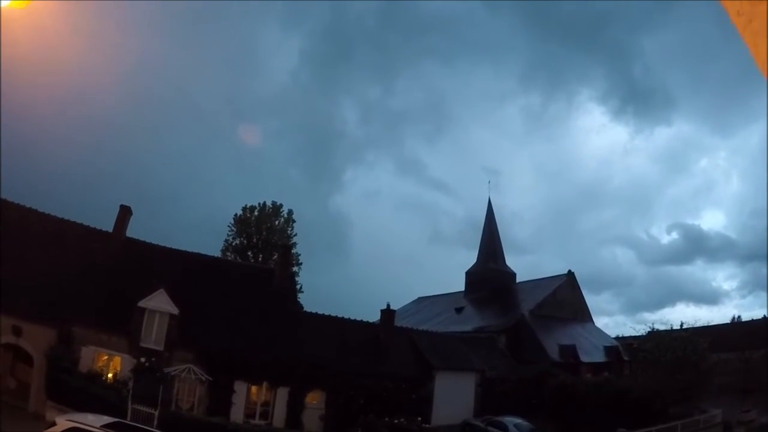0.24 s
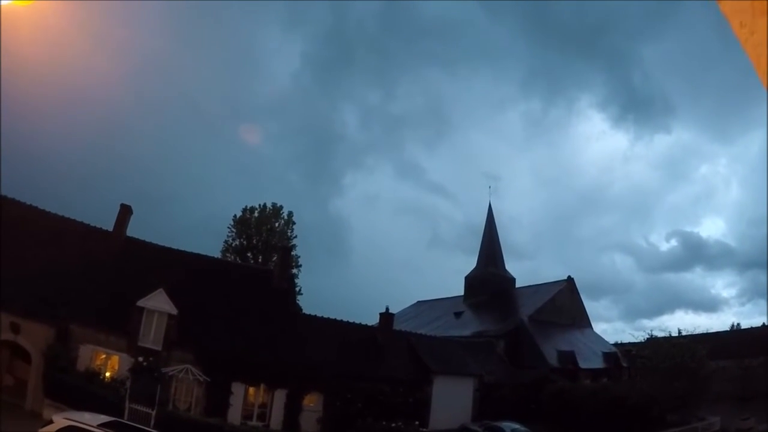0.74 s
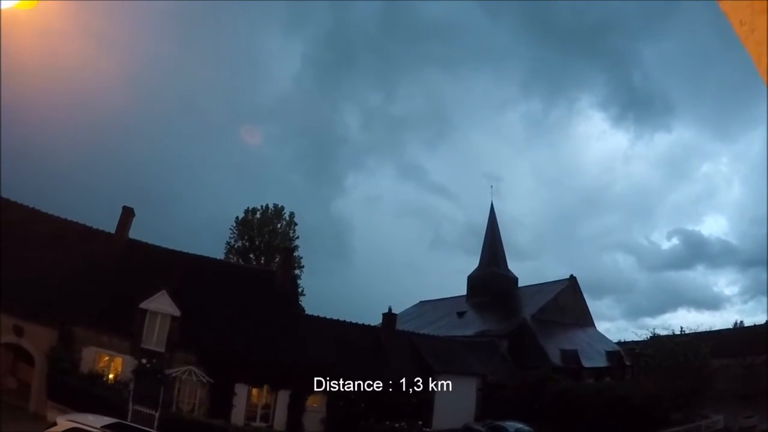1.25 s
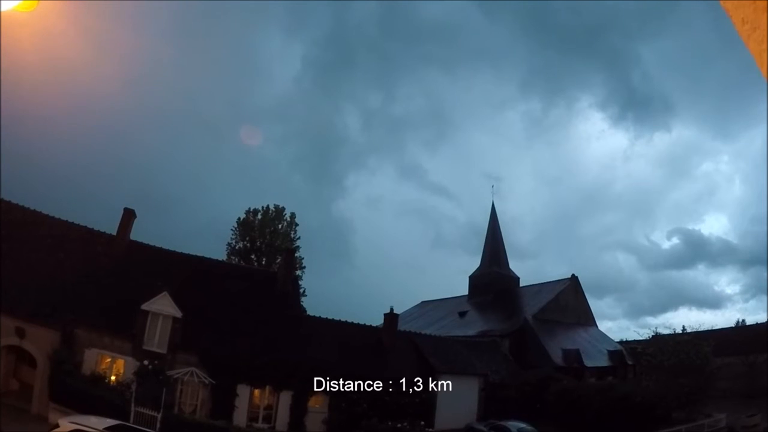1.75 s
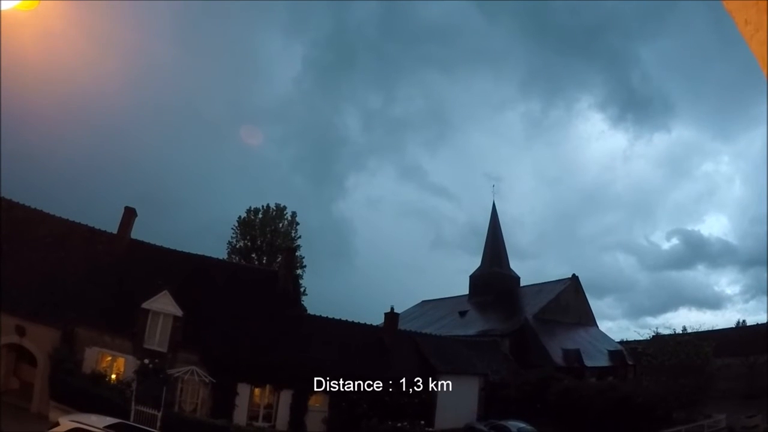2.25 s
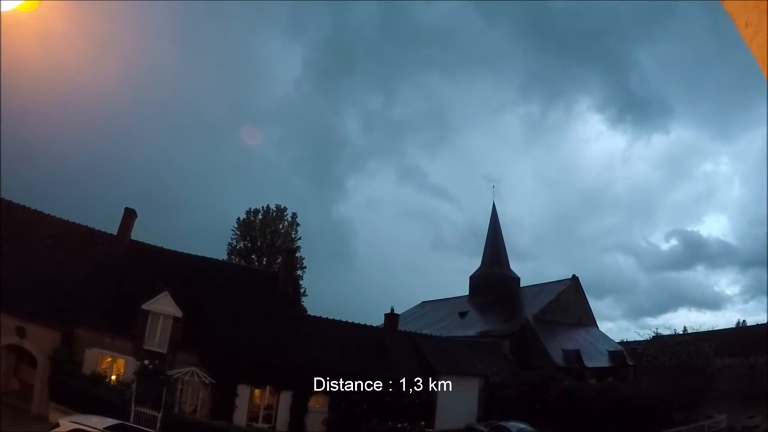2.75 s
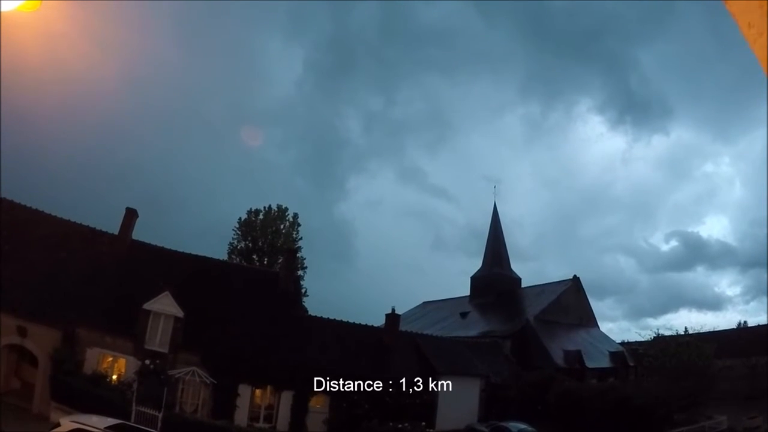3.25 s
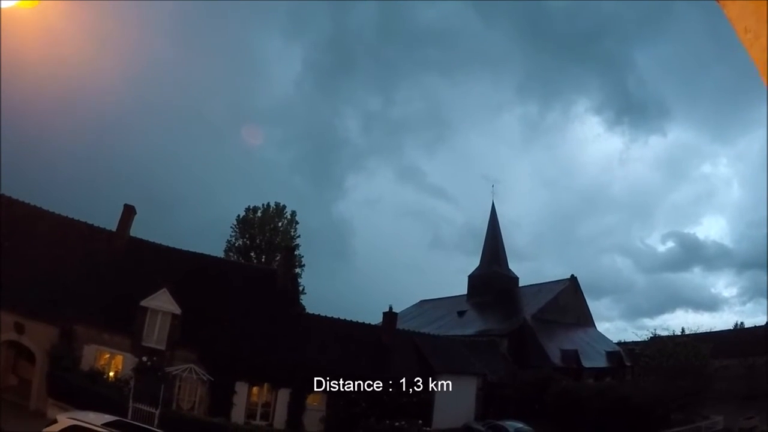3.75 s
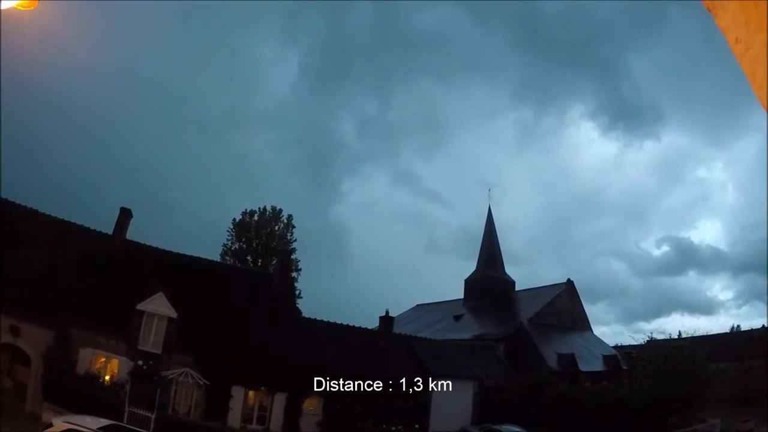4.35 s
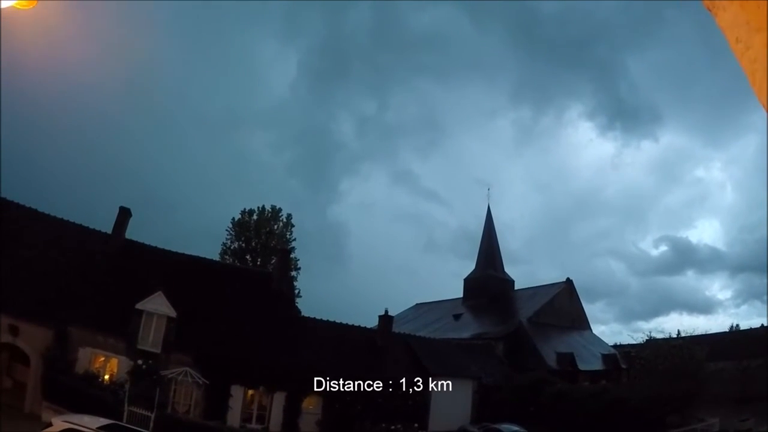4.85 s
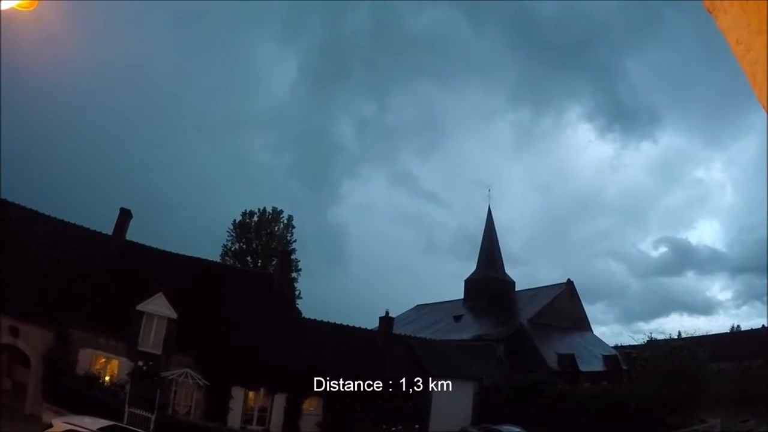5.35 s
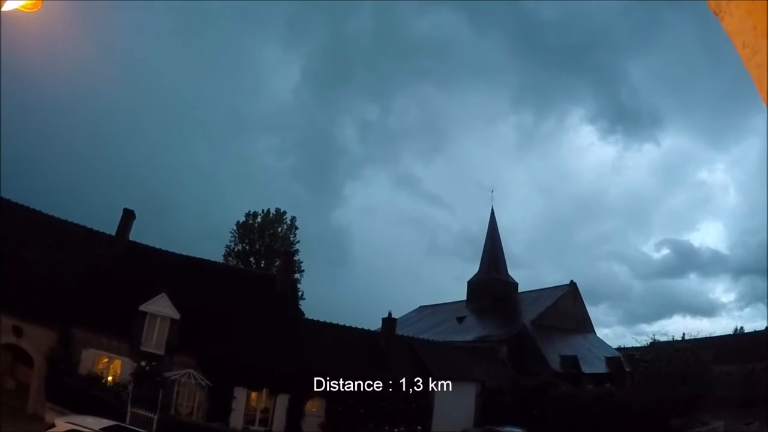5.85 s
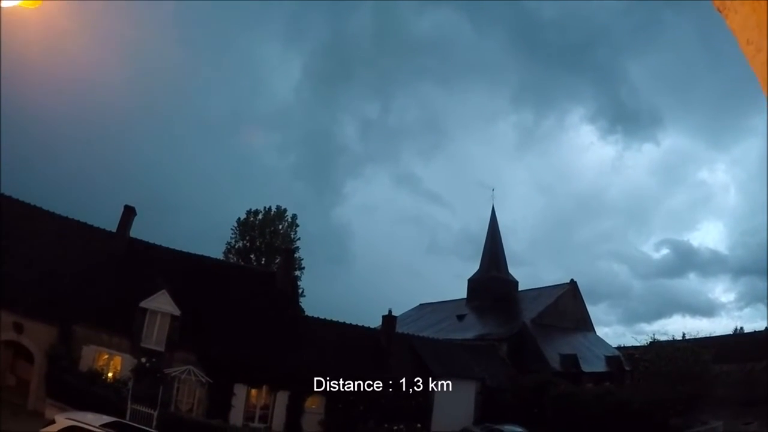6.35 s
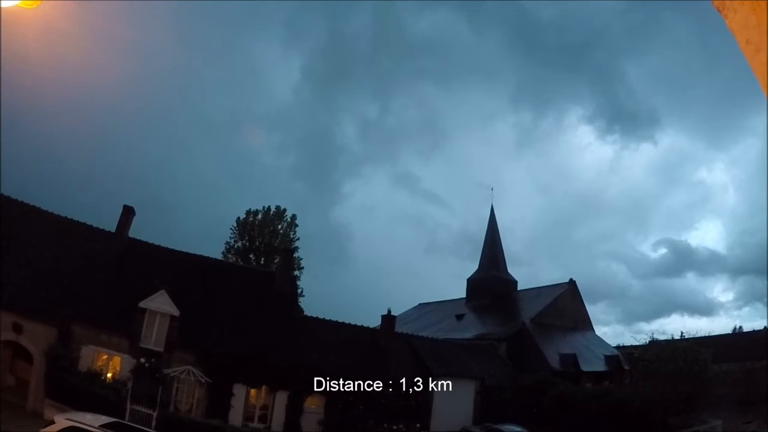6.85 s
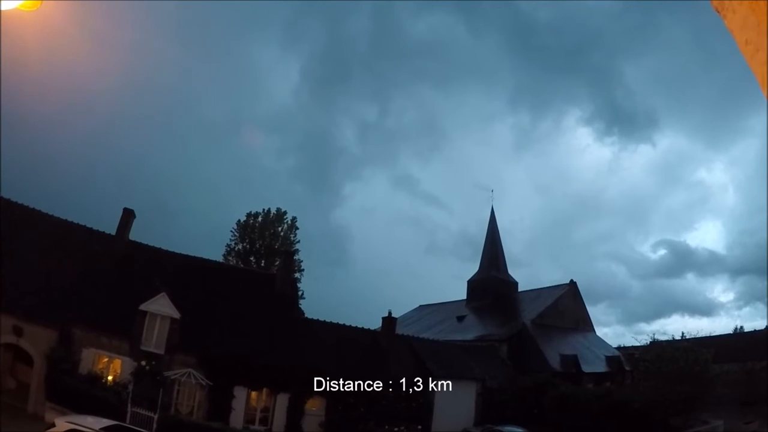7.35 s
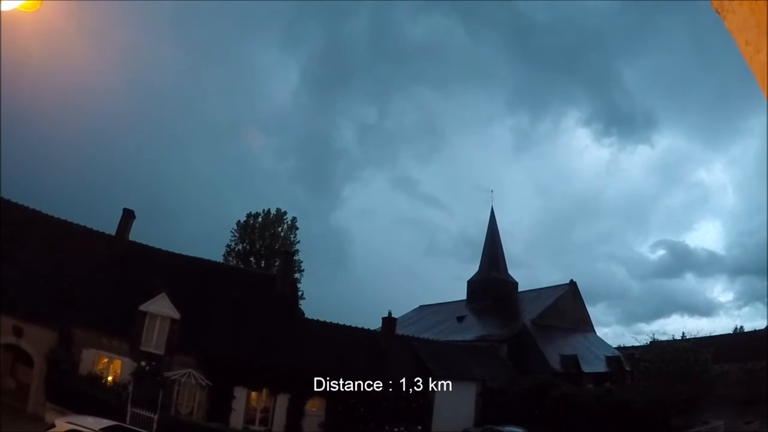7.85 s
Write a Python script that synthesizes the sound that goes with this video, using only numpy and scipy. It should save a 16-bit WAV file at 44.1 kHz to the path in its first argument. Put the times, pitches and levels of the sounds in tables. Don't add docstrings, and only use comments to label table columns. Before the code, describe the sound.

Deep thunder rolls between village houses, starting faintly, surging in heavy low thumps with soft tearing crackle, while a few raindrops tick close by

```python
import sys
import numpy as np
from scipy import signal
from scipy.fft import rfft, irfft, next_fast_len
from scipy.io import wavfile
from scipy.ndimage import uniform_filter1d

SR = 44100
rng = np.random.default_rng(int(sys.argv[2]) if len(sys.argv) > 2 else 0)


def makeup_ratio(level_db):
    decades = np.asarray(level_db, float) / 20
    return 10 ** decades


def unload_audio(sound):
    columns = np.transpose(np.atleast_2d(sound))
    steps = np.round(np.clip(columns, -1, 1) * 32767)
    wavfile.write(sys.argv[1], SR, steps.astype(np.int16))


N = 357210


def evened(x):
    return x / np.sqrt(np.mean(x ** 2) + 1e-20)


def read(points, hz):
    f, value = np.transpose(points)
    return np.interp(np.log(hz + 1), np.log(f + 1), value)


def add(mix, s, sound):
    part = mix[round(s * SR):][:len(sound)]
    part += sound[:len(part)]


def coloured(x, points):
    gain_db = read(points, abs(np.fft.fftfreq(16384, 1 / SR)))
    log_gain = np.log(makeup_ratio(np.maximum(gain_db, -100)))
    phase = -signal.hilbert(log_gain).imag
    taps = np.fft.ifft(np.exp(log_gain + 1j * phase)).real[:8192]
    return signal.oaconvolve(x, taps)[:len(x)]


def clicks(per_s, spread_db):
    size = makeup_ratio(spread_db * np.minimum(rng.exponential(1, N), 4))
    sign = rng.choice([-1., 1.], N)
    return evened(size * sign * (rng.random(N) < per_s / SR))


# f/Hz, time to fall 60 dB/s
SQUARE_ECHO = [
    (40, 0.77),
    (200, 0.51),
    (800, 0.78),
    (3000, 0.49),
]


def square(x, directions=11):
    hz, t, z = signal.stft(rng.standard_normal((directions, SR)), SR, nperseg=1024)
    fade_db = -60 * t / read(SQUARE_ECHO, hz)[:, None]
    tails = signal.istft(z * makeup_ratio(fade_db), SR, nperseg=1024)[1]
    direction = rng.integers(0, directions, N)
    size = next_fast_len(N + SR + 2048)
    echo = 0
    for k, tail in enumerate(tails):
        echo = echo + rfft(x * (direction == k), size) * rfft(tail / np.linalg.norm(tail), size)
    echo_db = 12.5
    return x + makeup_ratio(echo_db) * irfft(echo, size)[:N]


# t/s, level/dB
ROLL_LEVEL = [(0, -49), (.08, -59), (.708, -60.5), (.718, -48), (1.3, -45), (1.36, -36.5), (2.1, -32),
              (2.8, -30), (3.45, -33.5), (4.1, -35), (5.05, -32.5), (5.4, -28), (5.75, -32), (6.35, -30),
              (6.75, -27.5), (7.25, -33.5), (7.6, -27.5), (8.1, -32.5)]
# t/s, share (0-1)
FARNESS = [
    (0, 0.7),
    (1.5, 0.41),
    (3.3, 0.03),
    (4.2, 0.46),
    (5.2, 0.76),
    (6, 0.77),
    (8.1, 0.94),
]
# f/Hz, level/dB per Hz
NEAR_COLOUR = [(12, -19.5), (34, -8), (50, 5), (105, -6.5), (160, -14), (240, -7), (319, -4.5),
               (429, -13.5), (470, -10.5), (540, -21), (790, -32), (1770, -40.5), (2400, -54), (5000, -89)]
# f/Hz, level/dB per Hz
FAR_COLOUR = [(12, -30), (34, -9.5), (50, -6), (155, -5.5), (193, -14), (227, -8), (278, -16), (326, -10.5),
              (470, -18), (590, -21.5), (760, -30.5), (880, -38.5), (1370, -42.5), (2220, -66.5),
              (5000, -97.5)]
RANGE_EDGES_HZ = (80, 200, 500, 850)
# centre f/Hz, level/dB at the middle level, share of the level followed, gain from afar/dB
RANGES = [
    (50, -31, 0.99, 4.5),
    (130, -29.5, 0.99, 2.5),
    (330, -32.5, 1.08, -1.5),
    (650, -44, 1.33, -3),
    (1300, -54, 1.15, -10),
]
# t/s,
# swell level/dB, f/Hz, length/s
SURGES_AND_LULLS = [(0.719, 9.5, 300, 0.026), (0.92, 5, 200, 0.052), (1.012, -12, 50, 0.066),
                    (1.212, 7.5, 242, 0.042), (2.482, 6, 370, 0.044), (2.55, 7, 50, 0.042), (2.702, 7.5, 50, 0.024),
                    (2.744, 6.5, 160, 0.027), (2.84, 4.5, 151, 0.02), (0.945, 10, 42, 0.04), (3.225, 5, 110, 0.071),
                    (3.334, 6.5, 55, 0.089), (3.53, 2.5, 130, 0.022), (3.604, 15, 55.4, 0.021),
                    (3.707, 5.5, 60, 0.078), (4.23, 5, 110, 0.015), (4.42, 4.5, 50, 0.04), (4.66, 2.5, 110, 0.074),
                    (4.838, 3, 79.6, 0.031), (5.536, 4, 109, 0.031), (5.75, -5.5, 45, 0.05),
                    (6.037, 10.5, 74.6, 0.034), (5.9, -3.5, 200, 0.086), (6.58, 6, 145, 0.035),
                    (6.766, 5, 350, 0.048), (1.35, -4, 45, 0.056), (7.388, 8, 120, 0.024), (7.547, 4, 330, 0.065),
                    (7.742, 5, 298, 0.022), (7.75, -5, 42, .05),
                    (0.795, -5, 130, 0.049), (1.09, -4, 45, .06), (1.8, -4, 150, 0.029), (1.48, -7, 80, 0.066),
         (1.83, -4, 83, 0.24), (2.195, -6, 130, 0.037), (2.503, -6.5, 151, 0.067), (2.618, -7.5, 50, 0.045),
         (3.8, -7, 40, .05), (4.4, 4, 53, .05), (4.32, -3, 88, 0.12), (3.758, -11.5, 120, 0.028),
         (4.105, -11, 55, 0.031), (4.5, -5, 51, 0.045), (4.95, -4, 42, 0.055), (5.965, -6.5, 60, 0.056),
         (6.31, -6, 180, 0.042), (5.25, -2, 45, 0.05), (7.301, -2.5, 90, 0.1), (7.79, -7, 50, 0.047),
         (8.01, -4, 70, 0.025), (6.139, -5, 200, 0.14), (2.708, -4.5, 200, 0.065), (4.78, -2.5, 110, .05),
         (0.23, 12.5, 42, 0.076), (1.2, -5, 65, 0.029), (5.078, -4, 116, 0.12), (5.3, -2.5, 80, .03),
         (6.99, -4.5, 100, 0.02), (6.464, -1.5, 100, 0.024), (2.318, -11, 200, 0.018),
         (2.422, -4.5, 270, 0.04)]
# t/s, swell level/dB, length/s
RIPS = [(0.784, 10, 0.098), (0.915, 11.5, 0.073), (1.05, 4, 0.056), (1.204, 8, 0.093), (2.005, 2, 0.035),
        (2.24, 3.5, 0.062), (2.487, 1, 0.075), (2.776, 4.5, 0.074), (2.86, 4.5, 0.036), (3.153, 5.5, 0.031),
        (1.867, 2.5, 0.062), (3.863, 0, 0.031), (4.25, 4, 0.033), (5.426, -1, 0.061), (5.94, 1, .06),
        (6.604, 1, 0.048), (5.572, 1.5, 0.13), (6.771, 1, 0.056), (7.16, 2.5, 0.08), (7.712, 0.5, 0.041),
        (3.407, 1, 0.034), (1.44, -4, 0.056)]
# t/s, swell level/dB, length/s
CRESTS = [(0.88, -2, 0.037), (1.06, -4, 0.05), (1.31, 1, 0.05), (1.492, 1, 0.05), (1.745, -1.5, 0.05),
          (2.1, -3, 0.05), (2.262, 1.5, 0.043), (3.015, 2, 0.055), (3.196, 4, 0.035), (3.286, 1.5, 0.05),
          (3.47, -2, 0.05), (3.577, 1.5, 0.041), (1.496, 0.5, 0.1), (5.42, 2, 0.08), (4.24, -3, 0.041),
          (4.342, 1.5, 0.05), (6.76, 2, 0.04), (5.028, -5, 0.055), (5.167, -4.5, 0.05), (7.35, 1, 0.37),
          (5.818, 4, 0.042), (5.912, -3.5, 0.045), (5.986, 3, 0.034), (6.155, 2.5, 0.039),
          (6.61, 5.5, 0.05), (6.818, 1.5, 0.05), (6.96, 2, 0.046), (7.133, 0.5, 0.05), (7.27, 3, 0.056),
          (7.56, 1, 0.06)]


def roll():
    t = np.arange(N) / SR
    shocks = square(clicks(per_s=300, spread_db=4.0))
    far = np.clip(np.interp(t, *np.transpose(FARNESS)), 0, 1)
    near_sound, far_sound = coloured(shocks, NEAR_COLOUR), coloured(shocks, FAR_COLOUR)
    spectrum = rfft((1 - far) * near_sound + far * far_sound)
    hz = np.fft.rfftfreq(N, 1 / SR)
    below = [0] + [1 / (1 + (hz / edge) ** 12) for edge in RANGE_EDGES_HZ] + [1]

    coarse = t[::128]
    rip_hz, reach_octaves = 1070, 1.35
    rips = [(s, db, rip_hz, length) for s, db, length in RIPS]
    s, swell_db, pitch_hz, length = np.transpose(SURGES_AND_LULLS + rips)
    swells_db = swell_db * np.exp(-((coarse[:, None] - s) / length) ** 2)
    s, swell_db, length = np.transpose(CRESTS)
    crest_db = np.exp(-((coarse[:, None] - s) / length) ** 2) @ swell_db

    middle_db = -32
    level_db = np.interp(t, *np.transpose(ROLL_LEVEL)) - middle_db
    out = np.zeros(N)
    for k, (centre_hz, db, share, far_db) in enumerate(RANGES):
        band = irfft(spectrum * (below[k + 1] - below[k]), N)
        power = uniform_filter1d(uniform_filter1d(band ** 2, size=3200), size=3200)
        steady = band / np.sqrt(power + 1e-20)
        surge_db = swells_db @ np.exp(-(np.log2(pitch_hz / centre_hz) / reach_octaves) ** 2)
        if k == 3:
            surge_db = surge_db + crest_db
        out += steady * makeup_ratio(db + share * level_db + far_db * far + np.interp(t, coarse, surge_db))
    return out


# f/Hz, level/dB per Hz
CALM_COLOUR = [(12, -34), (20, 0.5), (49, 3.5), (109, -8.5), (231, -15.5), (403, -20.5), (490, -21),
               (764, -33), (1410, -36.5), (1710, -34), (2200, -36), (4920, -39), (6690, -42.5),
               (14200, -49.5), (15400, -55.5)]
DRIZZLE_HZ = (2300, 2900, 3700, 4600, 5700)


def calm():
    ticks = clicks(per_s=150, spread_db=3.8)
    kind = rng.integers(0, len(DRIZZLE_HZ) - 1, N)
    fizz, drizzle = rng.standard_normal(N), 0
    for k, band in enumerate(zip(DRIZZLE_HZ, DRIZZLE_HZ[1:])):
        size = signal.lfilter([1], [1, -np.exp(-1 / 200)], ticks * (kind == k))
        drizzle = drizzle + signal.lfilter(*signal.butter(2, band, "band", fs=SR), size * fizz)
    hiss = evened(coloured(rng.standard_normal(N), CALM_COLOUR))
    hiss_db, drizzle_db = -48.5, -81.5
    return makeup_ratio(hiss_db) * hiss + makeup_ratio(drizzle_db) * evened(drizzle)


# t/s, peak level/dB, f/Hz, time to fall 60 dB/s, width/octaves
DROPS = [(0.251, -54, 3460, .05, .56), (.322, -54, 4060, .05, .8), (.575, -59, 5500, 0.25, .72),
         (0.937, -48, 4560, 0.055, 0.92), (.947, -52, 4500, 0.056, 1.2), (1.943, -57, 3500, .056, 1.05),
         (4.627, -49, 3400, 0.04, 0.9), (4.68, -55, 2500, .1, 0.56), (4.88, -59, 4700, .054, .4),
         (4.952, -49.5, 4200, .055, 1), (5.204, -56, 2900, .07, .9), (5.879, -45, 2650, .04, .3),
         (5.893, -59, 4900, .05, .4), (6.05, -60, 3500, .08, 1.3), (6.559, -54.5, 4830, 0.044, .45),
         (6.714, -51, 3800, 0.055, 1.7), (6.716, -55, 6630, 0.15, .36), (6.742, -56.5, 3970, .14, 1.7),
         (6.787, -56, 4530, 0.11, .15), (6.812, -58.5, 4000, .1, 1.1), (7.85, -46, 2900, 0.038, 0.42)]


def drops():
    out, t = np.zeros(N), np.arange(4000) / SR
    splash = rng.standard_normal((len(DROPS), len(t)))
    for (s, db, hz, t60, octaves), noise in zip(DROPS, splash):
        spread = 2 ** (max(octaves, .05) / 2)
        ring = 0.8 * np.exp(-octaves / 0.55)
        band = signal.butter(3, [hz / spread, hz * spread], "band", fs=SR)
        tick = evened(signal.lfilter(*band, noise))
        tone = np.sin(2 * np.pi * hz * t)
        envelope = makeup_ratio(db - 6.0 - 60 * t / t60) * np.minimum(t / 0.0008, 1)
        add(out, s, envelope * ((1 - ring) * tick + ring * tone))
    return out


# t/s, peak level/dB, time to fall 60 dB/s
FRONTS = [(0.713, -25.5, 0.053), (1.187, -39, 0.2), (1.218, -27, 0.052), (1.349, -35, 0.14),
          (1.419, -27.5, 0.29), (1.767, -27, 0.19), (2.008, -25, 0.092), (2.253, -25, 0.074),
          (2.328, -21.5, 0.71), (2.47, -18.5, 0.15), (2.552, -33, 0.12), (2.827, -27, 0.11),
          (3.135, -39, 0.13), (3.31, -18, 0.14), (3.82, -24, 0.15), (3.865, -23, 0.13),
          (4.239, -26.5, 0.15), (5.214, -22.5, 0.2), (5.379, -41, 0.13), (5.412, -39, 0.093),
          (5.737, -29, 0.29), (5.851, -28, 0.25), (6.21, -37, 0.1), (6.265, -40, 0.046), (6.392, -20, 0.23),
          (6.571, -30, 0.032), (6.72, -25.5, 0.44), (7.33, -37, 0.13), (7.702, -28, 0.074),
          (7.951, -43.5, 0.27)]


def fronts():
    out, t = np.zeros(N), np.arange(5000) / SR
    bass_cut = signal.butter(2, 380, "high", fs=SR)
    grit = []
    for colour in (NEAR_COLOUR, FAR_COLOUR):
        grit.append(signal.lfilter(*bass_cut, coloured(rng.standard_normal(N), colour)))
    rise = np.sin(np.minimum(t / .0025, 1) * np.pi / 2) ** 2
    for s, db, t60 in FRONTS:
        far = int(np.interp(s, *np.transpose(FARNESS)) > .5)
        burst = evened(grit[far][round(s * SR):][:len(t)])
        add(out, s, makeup_ratio(db - 11 - 60 * t / t60) * rise * burst)
    return out


# t/s, peak level/dB, f/Hz, length/cycles
CLAPS = [(0.716, -36, 59.2, 2.5), (0.839, -25, 113, 2.5), (0.914, -24, 102, 3), (1.078, -28, 157.5, 19),
         (1.713, -11.5, 141, 3.1), (1.784, -9.5, 135, 2), (1.842, -10, 135, 2.3), (2.466, -20, 86.1, 2.1),
         (2.825, -4.5, 53, 3), (2.846, -20, 51.1, 2.8), (3.133, -9, 118, 1.7), (3.181, -14, 51.1, 2.4),
         (3.522, -24, 99, 1.9), (3.598, -21, 62, 2), (4.595, -6.5, 59.2, 1.4), (5.26, -10, 61, 2.6),
         (5.344, -4, 65, 3), (5.402, -5, 54, 3.5), (6.562, -7.5, 70.0, 2), (6.732, 6, 90, 1.7),
         (6.743, -6, 77.6, 3.1), (6.894, -12, 113.5, 3.3), (7.366, -8, 142, 3.4), (7.497, -8, 51.1, 1.9),
         (7.551, -12, 143, 2.1), (7.671, 2, 113, 2.4), (7.722, 2, 83.4, 1.55)]


def claps():
    out = np.zeros(N)
    for s, db, hz, cycles in CLAPS:
        turns = np.arange(6000) / SR * hz
        shape = np.minimum(turns / 0.36, 1) ** 2 * np.exp(-2.5 * turns / max(cycles, .5))
        swings = np.sin(2 * np.pi * turns ** 0.9)
        add(out, s, -makeup_ratio(db - 2.5) * shape * swings)
    return signal.lfilter(*signal.butter(4, 600, fs=SR), out)


# t/s, peak level/dB, f/Hz, length/s
RINGS = [(0.89, -37, 338, 0.012), (1.432, -29, 330, 0.0089), (1.723, -23, 130, 0.015),
         (1.811, -20, 139, 0.011), (2.156, -29.5, 319, 0.015), (2.213, -31, 308, 0.012),
         (2.285, -33, 496, 0.012), (2.36, -29.5, 460, 0.02), (2.47, -33, 330, 0.022),
         (2.5, -28, 475, 0.017), (2.607, -19.5, 121, 0.01), (2.785, -30, 404, 0.012),
         (2.835, -33, 570, 0.0116), (2.838, -36.5, 705, 0.014), (2.845, -25, 318, 0.012),
         (2.847, -31, 140, 0.02), (3.188, -23.5, 152.5, 0.025), (3.245, -25, 243, 0.03),
         (3.337, -27, 480, 0.012), (3.421, -24, 318, 0.011), (3.51, -25, 119, 0.029),
         (3.632, -25.5, 139, 0.012), (3.687, -34, 121, 0.014), (4.103, -26.5, 118, 0.018),
         (4.394, -35, 119, 0.022), (4.62, -28, 120, 0.032), (4.693, -28, 119, 0.017),
         (4.779, -27.5, 122, 0.022), (5.231, -25.5, 233, 0.018), (5.25, -23, 119, 0.0097),
         (5.373, -18, 193, 0.011), (5.519, -20, 228, 0.0089), (5.829, -21.5, 130, 0.012),
         (6.147, -24, 136, 0.015), (6.404, -33.5, 416, 0.012), (6.645, -19.5, 120, 0.012),
         (6.73, -19.5, 165.4, 0.049), (6.755, -33, 604, 0.011), (6.762, -15.5, 333, 0.011),
         (6.954, -21, 140, 0.017), (7.048, -20, 120, 0.017), (7.408, -23.5, 161, 0.022),
         (7.523, -30.5, 483, 0.024), (7.535, -28.5, 374, 0.014), (7.558, -17.5, 149, 0.012),
         (7.681, -11.5, 120.4, 0.012), (7.752, -23, 140, 0.034), (8.087, -15, 121, 0.011),
         (1.602, -32.5, 330, 0.014), (1.822, -30.5, 314, 0.011), (1.968, -32.5, 330, 0.013),
               (2.484, -44, 815, 0.014), (2.556, -27, 308, 0.014), (2.744, -27, 345, 0.014),
               (2.748, -27, 192, 0.011), (2.77, -37, 572, 0.016), (2.785, -28, 240, 0.016),
               (2.839, -32.5, 464, 0.016), (2.839, -27, 166.5, 0.013), (2.884, -35, 467, 0.012),
               (3.088, -32.5, 510, 0.014), (3.218, -28, 313, 0.012), (3.412, -29, 487, 0.013),
               (3.442, -27, 240, 0.013), (3.572, -30.5, 454, 0.012), (3.662, -36, 493, 0.02),
               (4.132, -30.5, 246, 0.012), (4.23, -39.5, 512, 0.013), (4.612, -26.5, 296, 0.012),
               (4.679, -30, 169, 0.014), (5.426, -31, 411, 0.013), (5.45, -24, 232, 0.014),
               (5.468, -36, 574, 0.013), (5.594, -37, 650, 0.014), (6.1, -39, 330, 0.0096),
               (6.276, -29, 308, 0.011), (6.565, -20, 171, 0.015), (6.575, -32.5, 528, 0.014),
               (6.614, -46.5, 746, 0.013), (6.726, -34, 538, 0.015), (6.795, -22.5, 170, 0.014),
               (7.178, -33, 352, 0.013), (7.538, -16.5, 204, 0.012), (7.762, -23, 220, 0.018),
               (7.817, -20.5, 170, 0.011), (7.982, -36.5, 477, 0.021)]


def rings():
    out, t = np.zeros(N), np.arange(-.1, .1, 1 / SR)
    for s, db, hz, length in RINGS:
        envelope = makeup_ratio(db - 0.5) * np.exp(-(t / length) ** 2 / 2)
        add(out, s - .1, envelope * np.sin(2 * np.pi * hz * t))
    return out


# t/s, peak level/dB, decay/s
SPRAYS = [(1.1967, -54, 0.03), (1.3404, -61, 0.03), (1.4112, -58, 0.03), (1.5803, -63, 0.03),
          (1.7594, -59, 0.03), (1.9445, -58, 0.03), (2.0777, -58, 0.026), (2.2394, -56, 0.03),
          (2.3201, -60.5, 0.036), (2.392, -55, 0.03), (2.4894, -54, 0.03), (2.7237, -62, 0.026),
          (2.7594, -57, 0.03), (2.8394, -59, 0.037), (2.8594, -54, 0.045), (2.9494, -53, 0.027),
          (2.9911, -60, 0.026), (3.0744, -55, 0.025), (3.1542, -63, 0.03), (3.2126, -63, 0.03),
          (3.3134, -58, 0.03), (3.3494, -56, 0.03), (3.4336, -66, 0.024)]


def spray():
    size, after = np.zeros(N), np.arange(6000) / SR
    for s, db, decay in SPRAYS:
        add(size, s, makeup_ratio(db - 12.5) * np.minimum(after / .004, 1) * np.exp(-after / decay))
    ragged = makeup_ratio(3.0 * evened(uniform_filter1d(rng.standard_normal(N), size=200)))
    band = signal.butter(2, (1900, 2700), "band", fs=SR)
    return size * ragged * evened(signal.lfilter(*band, rng.standard_normal(N)))


def scene():
    return (roll() + calm() + drops() + fronts() + claps() + rings() + spray())[None]


def frame_buzz():
    frames_per_s, centre_hz, width_hz = 29.97, 12900, 1800
    frame = np.arange(N) / SR * frames_per_s
    strength = rng.random(300)[frame.astype(int)] ** 1.3
    gate = np.exp(-(frame % 1) / .2) * strength
    band = signal.butter(2, [centre_hz - width_hz / 2, centre_hz + width_hz / 2], "band", fs=SR)
    return evened(gate * signal.lfilter(*band, rng.standard_normal(N)))


def thinned_treble(x):
    hz, t, z = signal.stft(x, SR, nperseg=1024)
    power = (abs(z) ** 2).sum(axis=1, keepdims=True)
    loud_db = 10 * np.log10(uniform_filter1d(power, size=30) + 1e-12) + 27
    sparse_hz = 12800
    spared = np.where(hz < sparse_hz, .35 + .08 * (sparse_hz - hz) / 1000, 0)
    keep = 0.87 + .025 * loud_db - spared[:, None]
    size = abs(z)
    slow = uniform_filter1d(size, size=4, axis=2)
    held = np.where(hz[:, None] > sparse_hz, slow, size)
    weak = held < keep * np.median(size, axis=2, keepdims=True)
    top_hz = 15000 + 500 * np.repeat(rng.random(len(t)) ** 1.5, 4)[:len(t)]
    z *= ~(weak & (hz[:, None] > 8000)) * np.where(hz[:, None] > top_hz, makeup_ratio(-25.5), 1)
    return signal.istft(z, SR, nperseg=1024)[1]


# t/s, length/s, lost above f/Hz, level/dB left
STARVED = [(.116, .017, 5200, -11), (.672, .014, 7000, -10), (.779, .016, 4800, -10),
           (.865, .07, 12900, -16), (1.004, .034, 6600, -22), (1.205, .035, 12900, -12),
           (1.29, .03, 12900, -11), (3.157, .046, 12900, -17), (3.724, .016, 5700, -16),
           (3.724, .034, 12900, -14), (3.805, .035, 12900, -13), (4.3, .03, 12900, -11),
           (4.51, .03, 12900, -11), (4.83, .07, 12900, -9), (5.21, .025, 12900, -10),
           (5.62, .04, 12900, -11), (5.97, .035, 12900, -12), (5.393, .05, 12900, -9),
           (5.455, .04, 12900, -11), (5.51, .04, 12900, -8), (1.755, .035, 12900, -14)]


def treble_gaps(x):
    hz, t, z = signal.stft(x, SR, nperseg=512, noverlap=384)
    luck = np.repeat(rng.random((len(STARVED), 129)), 2, axis=1)[:, :len(hz)]
    for (s, length, edge_hz, db), chance in zip(STARVED, luck):
        above = (hz > edge_hz) & (chance < .9)
        scattered = (edge_hz < 11000) & (hz > 1900) & (chance < .35 - db / 70)
        z[:, above | scattered] *= makeup_ratio((db - 5) * np.exp(-(2 * (t - s) / length) ** 4))
    gaps_per_s, gap_s, gap_db, gap_hz = 2.2, .02, -11, 12900
    when, long, deep = rng.random((60, 3)).T
    start = np.cumsum(.1 - np.log(1 - when)) / gaps_per_s
    gaps = (abs(t[:, None] - start) < gap_s * (.3 + .4 * long)) @ (.5 + deep)
    z[:, hz > gap_hz] *= makeup_ratio(gap_db * np.minimum(gaps, 1.2))
    return signal.istft(z, SR, nperseg=512, noverlap=384)[1][:, :N]


def top_cut(x):
    return signal.sosfilt(signal.butter(12, 15590, fs=SR, output="sos"), x)


def record(dry):
    bass_cut = signal.butter(2, 22, "high", fs=SR)
    buzz_db = -89.5
    heard = signal.lfilter(*bass_cut, dry) + makeup_ratio(buzz_db) * frame_buzz()
    heard = np.pad(heard, ((0, 0), (0, 2048)), "reflect", reflect_type="odd")
    worn = treble_gaps(thinned_treble(heard))
    ending = np.minimum(np.arange(N)[::-1] / 30, 1)
    return top_cut(ending * worn)


dry = scene()
out = record(dry)
unload_audio(out)
```